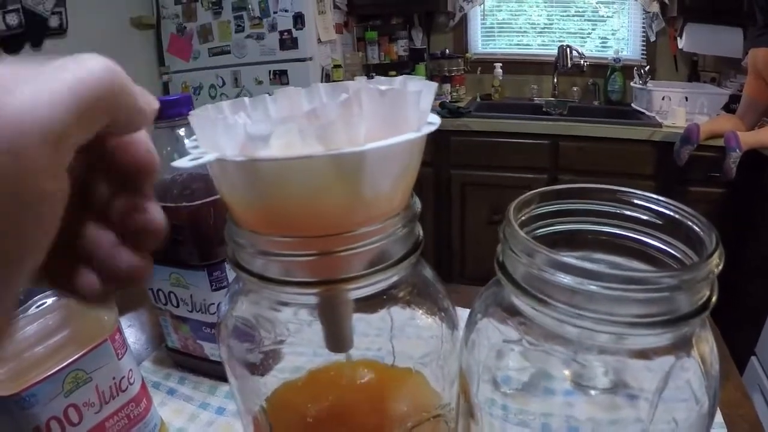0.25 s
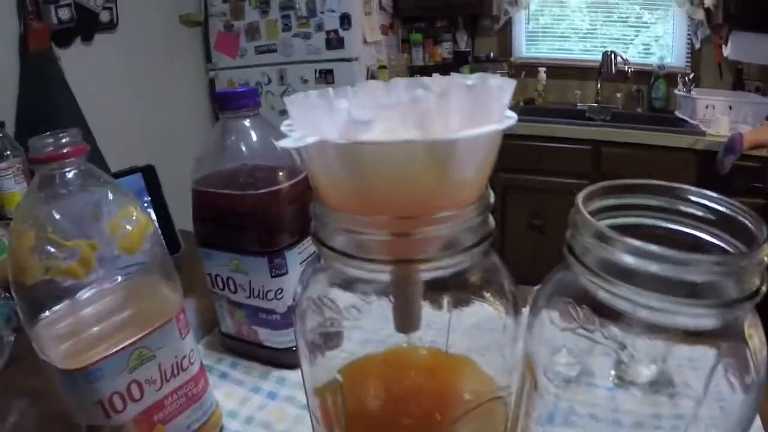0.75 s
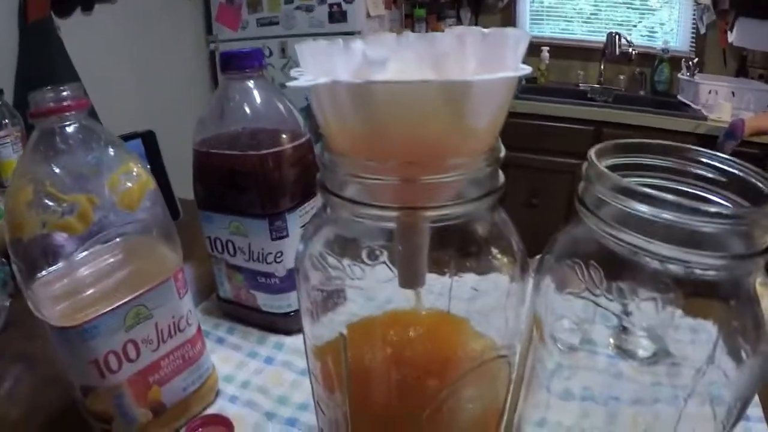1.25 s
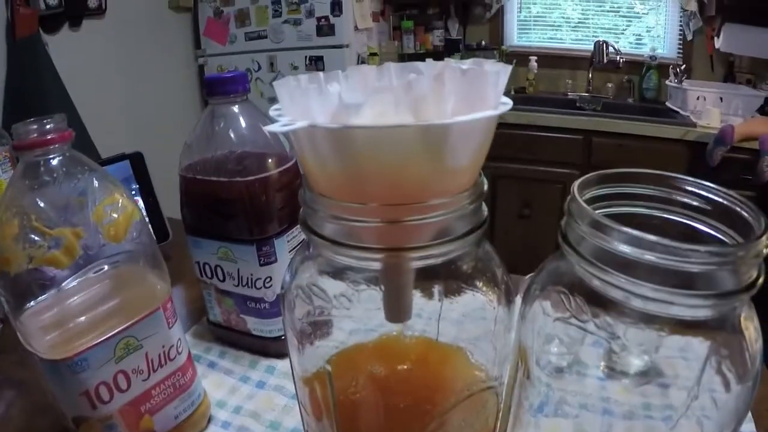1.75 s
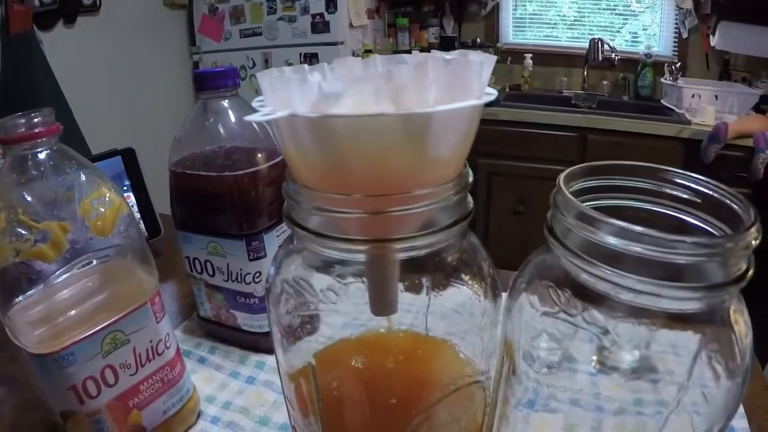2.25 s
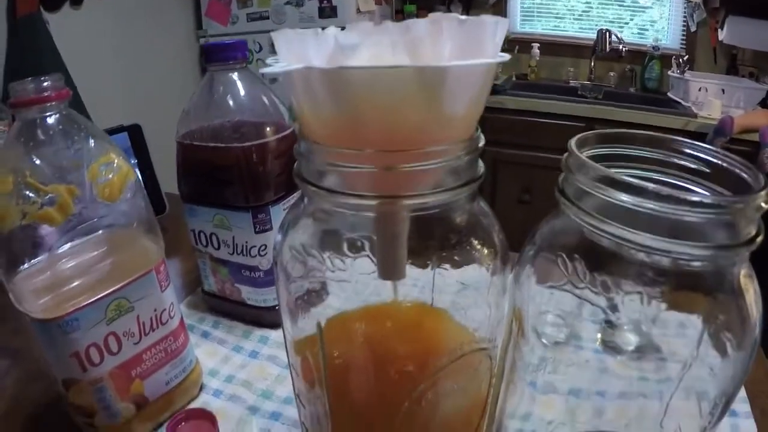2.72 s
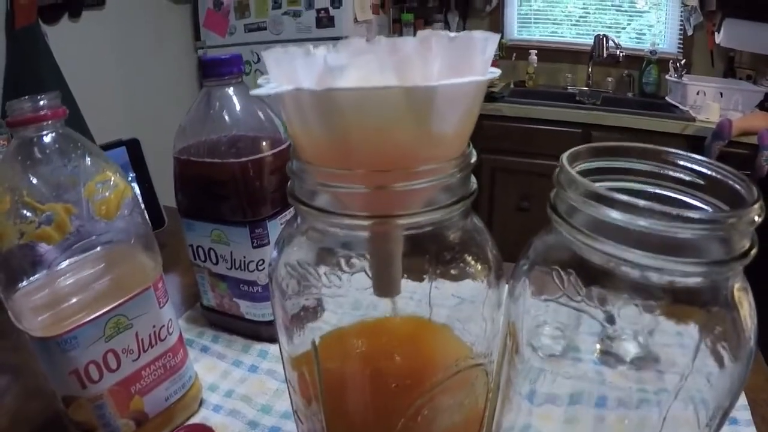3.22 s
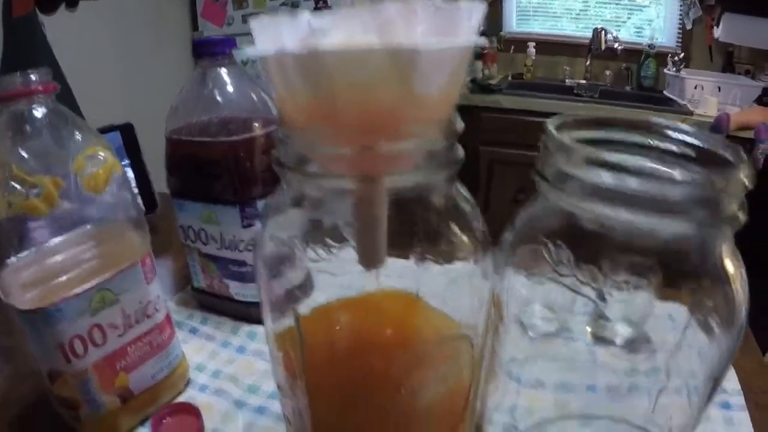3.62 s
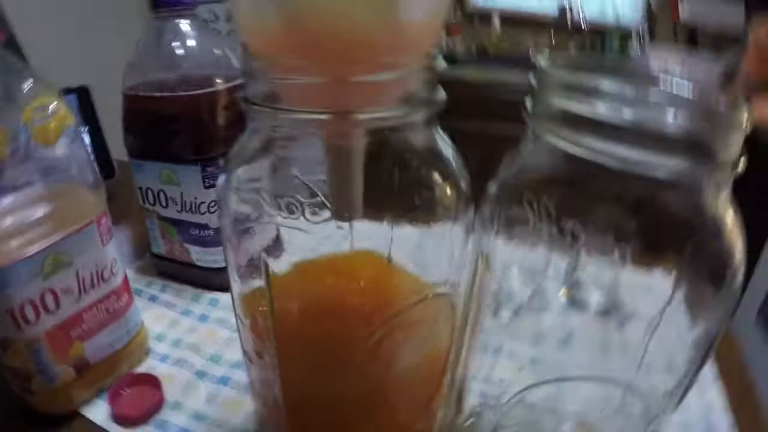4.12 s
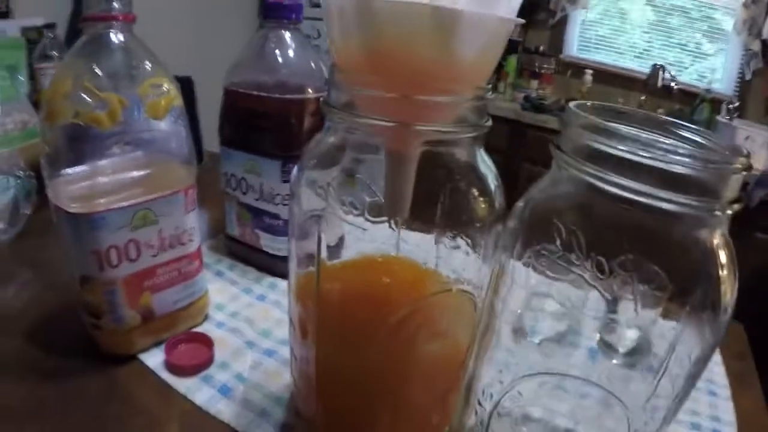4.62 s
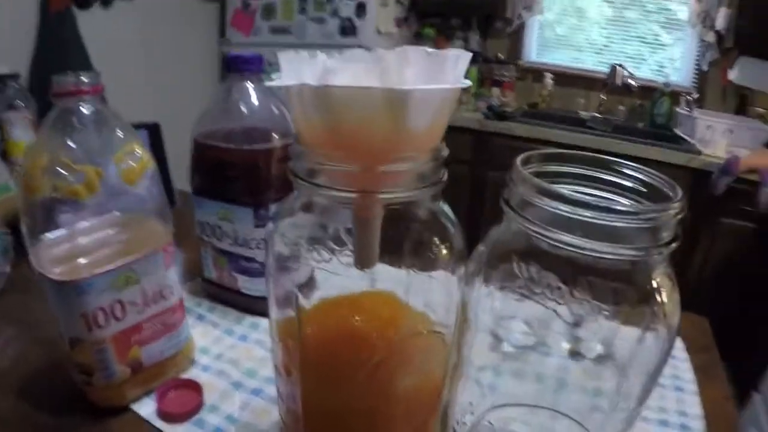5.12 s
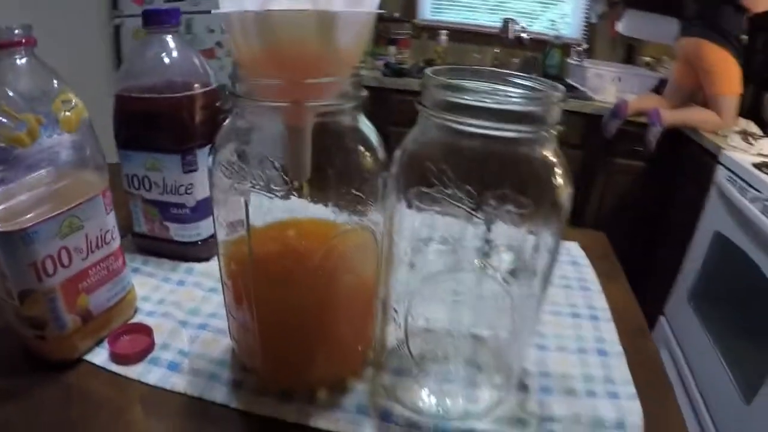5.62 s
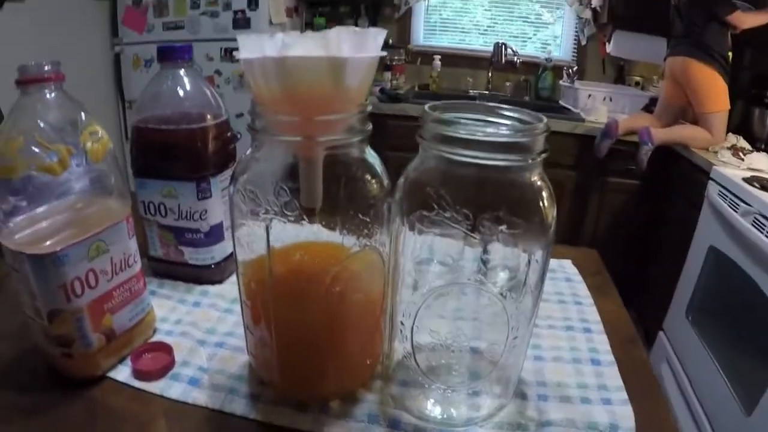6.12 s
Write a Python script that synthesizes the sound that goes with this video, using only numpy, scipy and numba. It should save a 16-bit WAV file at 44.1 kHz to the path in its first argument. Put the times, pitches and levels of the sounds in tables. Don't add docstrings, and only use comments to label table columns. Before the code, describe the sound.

Liquid drips with small glassy plinks into a jar in a humming kitchen, with heavy dull knocks, a sharp snap and faint cloth rustle.

```python
import sys
import numpy as np
from scipy import signal
from scipy.fft import rfft, irfft, next_fast_len
from scipy.io import wavfile
from scipy.ndimage import uniform_filter1d
from numba import njit

SR = 44100
rng = np.random.default_rng(int(sys.argv[2]) if len(sys.argv) > 2 else 0)


def elevation(decibels):
    levels = np.asarray(decibels, float)
    return 10 ** (levels / 20)


def digitize_waveform(pressure):
    field = np.atleast_2d(pressure).T
    bounded = np.clip(field, -1, 1)
    quanta = np.round(bounded * 32767).astype(np.int16)
    wavfile.write(sys.argv[1], SR, quanta)


N = 280917

# start in
# seconds, peak in dB, pitch in Hz.
JAR_DROPS = [(0.32, -46, 1870), (.552, -50.5, 1260), (1.0006, -50, 1910), (1.052, -53, 1780),
             (1.3199, -56.5, 1920), (1.4396, -57, 1890), (1.56, -60, 1264), (1.698, -67, 1920),
             (2.354, -65, 1890), (2.8799, -51, 1856), (2.882, -52.5, 1450), (3.11, -53.5, 1450),
             (3.119, -48.5, 1883), (3.255, -50, 1450), (3.4935, -52.5, 1910), (3.712, -49.5, 1873),
             (4.0668, -40, 1925), (4.375, -55, 1914), (5.0744, -60, 1845), (5.4006, -56, 1885),
             (5.5263, -55, 1937), (6.027, -45.5, 1930),
             (.81, -58, 3530), (.98, -58, 2444), (1.2, -63, 2440), (1.8054, -61, 3740),
               (2.3694, -60, 2460), (3.427, -45.5, 3810), (4.495, -57, 3760), (4.6044, -39.5, 3750),
               (4.6932, -54, 2470), (4.7, -59, 3760), (5.39, -58, 2350), (5.673, -55, 2800),
               (5.675, -61, 3820)]
# start in seconds, peak in dB, centre in Hz.
SPLASHES = [(.321, -46, 1870), (.696, -50, 1880), (0.8, -54, 2590), (.975, -49, 1910), (.9762, -48.5, 2310),
            (1.12, -51, 3980), (1.265, -54.5, 2990), (1.2895, -53, 2500), (1.4388, -45, 3050),
            (1.6741, -55, 2790), (3.6316, -50.5, 2760), (3.712, -44, 1876), (3.815, -41.5, 890),
            (4.4832, -45.5, 3290), (4.7122, -43, 2470), (4.7496, -49, 2460), (4.989, -43, 1680),
            (5.5707, -49, 2400), (5.7404, -54, 3180), (5.8396, -54, 2860), (5.9658, -44, 2900),
            (6.331, -54, 2880)]
# start in seconds, peak in dB, pitch in Hz.
TINKLES = [(.7976, -61, 6010), (1.1199, -58, 5070), (1.2645, -60.5, 7950), (1.3079, -52, 4990),
           (1.4396, -51, 4995), (1.5479, -62, 5530), (1.8198, -49.5, 5050), (1.9415, -57, 5930),
           (2.0438, -60, 5300), (4.5136, -58, 5989), (4.7117, -68, 4860), (4.7506, -55, 5370),
           (5.7894, -62, 5040), (5.9688, -63, 5940), (6.2294, -62, 5960), (6.3185, -64, 5360)]
# mode in Hz, T60 in seconds.
JAR_RING = [(1260, 0.055), (1450, 0.43), (1780, 0.77), (1900, .1), (2450, .25), (2800, .2), (3750, 0.19)]
DROP_LEAD_S = 0.001993
DROP_HELD_S, TINKLE_T60_S, SPLASH_T60_S = .024, .145, .068
# mode in Hz, width in Hz, level in dB.
JAR_WALLS = [(1046, 14.5, -79), (1793, 33, -82.5), (1847, 57, -77.5), (1910, 20, -80), (2470, 40, -81.5),
             (3760, 44, -81)]

# pitch in Hz, level in dB, T60 in seconds.
CLINK = [(1448, -21, 1.2), (1500, -5, .08), (1610, -5, .08), (1723, -1, .45), (1771, 0, .6),
         (1911, -4, .38), (1935, 5, .06), (2450, -21, .2), (3750, -22, .15)]
CLINK_S, CLINK_DB = .410, -44
# pitch in Hz, level in dB, T60 in seconds.
CUP = [(170, 2, 0.16), (343, -7, .2), (398.2, 1, 0.3), (813, -2, 0.29), (890, -3, 0.19), (1254, -16, 0.58),
       (1326, 3, 0.073), (1407, -5, 0.22), (1873, -13.5, 0.49), (1960, -8, .15), (2720, 6, 0.03),
       (3650, -13, 0.28), (5400, -9, .05), (2770, -7, 0.13)]
CUP_S, CUP_DB = 4.831, -39.5
# pitch in Hz, level in dB, T60 in seconds.
PAN = [(178.9, 4.5, 0.41), (427, -3, 0.16), (804, -11, 0.14), (1170, -5.5, 0.081), (1450, -7, 0.079),
       (1756, -6, 0.092), (2044, -6, 0.063), (2350, 1, 0.043), (2860, -3.5, 0.06)]
PAN_S, PAN_DB = 6.162, -33.5
# pitch in Hz, level in dB, T60 in seconds.
SNAP = [(560, 0, 0.017), (820, 4.5, 0.0095), (1250, 4, .01), (1800, -6, 0.009), (2350, 7, 0.013),
        (2640, -4, 0.0088), (3200, -6, 0.0083), (3720, -1.5, 0.011), (5300, -5, .01), (5850, -10, .01)]
# start in seconds, level in dB.
SNAPS = [
    (4.1665, -47),
    (4.1812, -30),
    (4.1965, -59),
]
# start in seconds, level in dB, pitch in Hz, T60 in seconds.
THUDS = [
    (2.64, -24.5, 145, 0.42),
    (3.72, -44, 66, 0.6),
    (6.165, -26, 52, 0.32),
    (6.19, -30, 29.8, 0.5),
]

# start in seconds, thump in dB, rap in dB, scrape in dB, T60 in seconds.
KNOCKS = [
    (2.4407, -32.5, -53, -70, .095),
    (2.4897, -31, -60, -67, .14),
    (2.66, -24, -41, -49.5, .35),
    (2.7195, -37, -49.5, -67, .42),
    (3.1904, -47, -39, -48, 0.35),
    (4.8351, -35, -32, -48, 0.23),
    (6.1624, -24.5, -32, -90, .26),
    (6.25, -46, -66, -65, .23),
]
# centre in Hz, width in Hz, level in dB.
THUMP = [(145, 92, -6.5), (322, 395, -13.5)]
# centre in Hz, width in Hz, level in dB.
RAP = [(940, 900, -7), (2550, 2200, -11.5)]
# centre in Hz, width in Hz, level in dB.
SCRAPE = [(5740, 4100, -7)]
KNOCK_CONTACT_S, SOFTNESS = 0.0047, 0.19
# frequency in Hz, gain in dB.
CORNER = [(60, 7), (1000, -1.5), (1650, 1), (2400, 1), (3000, 0.5), (3650, 1.5), (4400, -2), (5400, -0.5),
          (6200, -0.5), (7200, -8), (15000, -15)]
# start in seconds, peak in dB.
TICKS = [
    (0.41, -55),
    (0.9742, -57),
    (1.4376, -54),
    (3.1854, -51),
    (4.1809, -55),
    (4.4823, -59),
    (4.8336, -55),
    (4.9887, -54),
]

# peak time in seconds, rise in seconds, fall in seconds, peak in dB, dull part in dB.
SLEEVE = [
    (2.92, .14, .17, -62.5, -2),
    (3.82, 0.0065, 0.093, -60.5, 4),
    (5.012, 0.11, .09, -58.5, 0.5),
    (5.58, 0.087, .4, -65.5, 0),
    (5.964, .03, .09, -62.5, -2),
    (6.25, .02, 0.055, -66, -1),
    (6.36, 0.086, .05, -64.5, 4),
]
# peak time in seconds, rise in seconds, fall in seconds, peak in dB, dull part in dB.
TOWEL = [(3.86, .03, .12, -63, 1), (3.965, .05, 0.11, -55, -1.5), (4.056, .035, 0.023, -49.5, -5),
         (4.19, .004, .015, -49.5, -1), (4.27, 0.084, .017, -52.5, 1), (4.616, .085, 0.06, -57, -15),
         (4.71, .035, .08, -62.5, 1.5), (4.8, .03, 0.023, -62.5, -7), (4.902, .005, 0.073, -57.5, 3),
         (5.74, .05, .1, -65, -12), (6.215, .02, 0.036, -58, 10)]
STROKE_SWELL_DB, SLEEVE_BRIGHT_DB, TOWEL_BRIGHT_DB = 12.5, -5, -11

# time in seconds, shaft speed in Hz.
SHAFT = [(0, 28.44), (1.1, 28.45), (1.6, 28.75), (2.9, 28.28), (3.9, 28.16), (4.4, 28.44), (6.37, 28.4)]
# time in seconds, level in dB.
NEARNESS = [(0, -3.5), (1.0, -4), (2.2, -5), (2.9, 0), (6.37, 0)]
# order, level in dB, share of the nearness change as a ratio.
MOTOR_LOWER = [(1, -45.5, 1.1), (2, -44.5, 0.76), (3, -55, 1.03), (5, -49.5, 0.1)]
# order, level in dB.
MOTOR_UPPER = [(4, -83), (6, -63.5), (7, -67.5), (8, -66.5), (11, -67.5), (12, -70)]
# shaft order, time in seconds, depth in dB, half width in seconds.
NODES = [(1, 1.16, -12, 0.27), (2, 1.58, -16, 0.19), (2, .1, -3, .3), (5, .45, -5, 0.23),
         (5, 1.42, -4, 0.26), (1, 4.3, -2, .3), (1, 5.9, -2, .5)]
# time in seconds, pitch in Hz.
FAN_HZ = [(0, 122), (.7, 122.2), (1.1, 123.3), (1.85, 123.8), (2.4, 122.9), (3.7, 122.2), (4.85, 122.5),
          (5.3, 123.3), (6.37, 123.2)]
# time in seconds, level in dB.
FAN_DB = [(0, -47.5), (.44, -43.5), (.88, -56.5), (1.5, -44), (1.8, -43), (2.42, -46.5), (2.9, -41),
          (3.1, -43), (3.3, -51.5), (3.7, -43), (4.15, -47), (4.4, -38.5), (4.65, -38), (5.3, -46),
          (5.8, -39.5), (6.37, -37)]
# pitch in Hz, level in dB.
TONES = [(49.9, -62), (99.9, -76), (161.6, -67), (176.8, -76), (179.9, -63.5), (242.5, -60.5),
         (353.4, -67.5), (404.2, -65.5), (412.3, -71), (444.5, -64)]
# pitch in Hz, width in Hz, level in dB.
WHINES = [(2590, 7.4, -77.5), (3588, 14, -76.5)]
# frequency in Hz, level in dB per Hz.
ROOM = [(8.8, -23), (15, 0.5), (38, -3.5), (72, -20.5), (131, -4), (186, -12.5), (287, -17), (431, -15.5),
        (543, -24), (1030, -28), (1540, -37.5), (1830, -35), (2440, -36.5), (3660, -38), (15100, -52)]
ROOM_DB, ECHO_DB = -49.5, -43
# start in seconds, length in seconds.
TOP_GAPS = [(.3, .04), (2.04, .035), (2.93, .01), (3.02, .04), (4.48, .015), (4.8, .025), (5.52, .025),
            (5.84, .025), (5.94, .025), (6.09, .015), (6.13, .05)]
TOP_HZ, GAP_FROM_HZ = 15300, 13200


def noise(size):
    return rng.standard_normal(N if size > SR else SR)[:size]


@njit
def svf(x, g, k):
    y, b, l = np.empty(len(x)), 0., 0.
    for i in range(len(x)):
        v = (b + g * (x[i] - l)) / (1 + g * (g + k))
        b, l, y[i] = 2 * v - b, l + 2 * g * v, k * v
    return y


def band(hz, width, size=N):
    g, k = np.tan(np.pi * hz / SR), width / hz
    y = svf(svf(noise(size), g, k), g, k)
    return y / y.std()


def colour(x, table):
    size = next_fast_len(N)
    f = np.maximum(np.fft.rfftfreq(size, 1 / SR), 1)
    hz, db = np.transpose(table)
    gain = elevation(np.interp(np.log(f), np.log(hz), db))
    return irfft(rfft(x, size) * gain, size)[:N]


def walk(rate):
    hold = int(SR / rate)
    steps = np.repeat(noise(size=SR)[:N // hold + 1], hold)
    return 1.12 * uniform_filter1d(uniform_filter1d(steps, hold), hold)[:N]


def curve(table):
    s, value = np.transpose(table)
    return np.interp(np.arange(N) / SR, s, value)


def add(out, s, sound):
    i = int(s * SR)
    out[i:i + len(sound)] += sound[:N - i]


def fade(t60, rise_s, held_s=0.):
    t = np.arange(int((t60 + held_s) * SR)) / SR
    rise = 1 - np.exp(-t / rise_s)
    return t, rise * elevation(-60 * np.maximum(t - held_s, 0) / t60)


def glass_drop(db, hz, t60, held_s, spread, cluster_db):
    t, env = fade(t60, .0004, held_s)
    settle = 2000
    cluster = elevation(cluster_db) * band(hz, spread, size=len(t) + settle)[settle:]
    return elevation(db) * env * (np.sin(2 * np.pi * hz * t) + cluster)


def drips():
    out = np.zeros(N)
    for s, db, hz in JAR_DROPS:
        t60 = min(JAR_RING, key=lambda mode: abs(mode[0] - hz))[1]
        add(out, s - DROP_LEAD_S, glass_drop(db - 8, hz, t60, DROP_HELD_S, spread=140, cluster_db=-8.5))
    for s, db, hz in SPLASHES:
        add(out, s, glass_drop(db - 11.5, hz, SPLASH_T60_S, 0.0029, spread=380, cluster_db=2.5))
    for s, db, hz in TINKLES:
        t60 = TINKLE_T60_S
        add(out, s, glass_drop(db - 10, hz, t60, 0.0072, spread=120, cluster_db=-3.5))
        add(out, s, glass_drop(db - 17.5, 1.055 * hz, t60, 0.0071, spread=180, cluster_db=-4))
        add(out, s, glass_drop(db - 16.5, 1.14 * hz, .6 * t60, 0.0036, spread=400, cluster_db=-2))
    return out


def trickle():
    return sum(elevation(db + 3.6 * walk(12)) * band(hz, width) for hz, width, db in JAR_WALLS)


def crockery():
    out = np.zeros(N)
    struck = [(CLINK_S, CLINK_DB, CLINK, .005), (CUP_S, CUP_DB, CUP, .12), (PAN_S, PAN_DB, PAN, .1)]
    struck += [(s, db, SNAP, .005) for s, db in SNAPS]
    for s, level_db, modes, rattle_s in struck:
        for hz, db, t60 in modes:
            t, env = fade(rattle_s, 0.00081)
            push = env * noise(len(t))
            push *= 0.45 / np.sqrt(np.sum(push ** 2))
            push[int(rng.random() * .0012 * SR)] = 1
            t, env = fade(t60, 0.00057)
            ring = elevation(level_db + db) * env * np.sin(2 * np.pi * hz * t)
            add(out, s, signal.fftconvolve(ring, push))
    return out


def thuds():
    out = np.zeros(N)
    for s, db, hz, t60 in THUDS:
        t, env = fade(t60, 0.024)
        add(out, s, elevation(db) * env * np.sin(2 * np.pi * hz * t))
    return out


def knocks():
    out = np.zeros(N)
    for s, *parts_db, t60 in KNOCKS:
        thump_db, rap_db, _ = parts_db
        contact_s = KNOCK_CONTACT_S * elevation(SOFTNESS * (thump_db - rap_db))
        for part_db, part in zip(parts_db, (THUMP, RAP, SCRAPE)):
            for hz, width, db in part:
                slow = (2500 / hz) ** 0.18
                t, env = fade(t60 * slow, contact_s * slow)
                add(out, s - .002, elevation(part_db + db) * env * band(hz, width, size=len(t)))
    return colour(out, CORNER)


def ticks():
    out = np.zeros(N)
    for s, db in TICKS:
        t, env = fade(0.0094, 0.00024)
        add(out, s, elevation(db - 2.0) * env * band(12100, 7500, size=len(t)))
    for s, _, _, scrape_db, _ in KNOCKS:
        t, env = fade(.3, .008)
        add(out, s, elevation(scrape_db - 20) * env * band(9500, 7900, size=len(t)))
    return out


def rustle():
    power = np.zeros((3, N))
    for strokes, bright_db in ((SLEEVE, SLEEVE_BRIGHT_DB), (TOWEL, TOWEL_BRIGHT_DB)):
        for s, rise_s, fall_s, db, dull_db in strokes:
            before = np.linspace(2, 0, int(2 * rise_s * SR))
            after = np.linspace(0, 2, int(2 * fall_s * SR))
            swell_db = db - STROKE_SWELL_DB * np.r_[before, after]
            for part, part_db in zip(power, (0, bright_db, dull_db)):
                add(part, s - 2 * rise_s, elevation(2 * (swell_db + part_db)))
    grains = [band(2840, 1970), band(5500, 1870), band(833, 480)]
    cloth = np.sum(np.sqrt(power) * grains, axis=0)
    return colour(cloth * elevation(2.4 * walk(120)), CORNER)


def motor():
    t, near_db = np.arange(N) / SR, curve(NEARNESS)
    turn = 2 * np.pi * np.cumsum(curve(SHAFT)) / SR
    out = np.zeros(N)
    for k, db, share in MOTOR_LOWER:
        dips_db = sum(depth * np.exp(-((t - s) / half) ** 2) for j, s, depth, half in NODES if j == k)
        out += elevation(db + share * near_db + dips_db) * np.sin(k * turn + k * k)
    for k, db in MOTOR_UPPER:
        out += elevation(db + 1.9 * walk(2.0)) * np.sin(k * turn + k)
    return np.sqrt(2) * out


def appliances():
    t = np.arange(N) / SR
    out = elevation(curve(FAN_DB)) * np.sin(2 * np.pi * np.cumsum(curve(FAN_HZ)) / SR)
    for hz, db in TONES:
        out += elevation(db + 1.2 * walk(3.11)) * np.sin(2 * np.pi * hz * t + hz)
    return np.sqrt(2) * out


def whistles():
    t, out = np.arange(N) / SR, np.zeros(N)
    for hz, width, db in WHINES:
        tone = np.sin(2 * np.pi * hz * t)
        out += elevation(db + 2.4 * walk(3.12)) * (tone + 0.49 * band(hz, width))
    return out


def room():
    air = elevation(0.62 * walk(6)) * colour(rng.standard_normal(N), ROOM)
    return air / air.std() * elevation(ROOM_DB)


def echo(near):
    t, tail = fade(0.36, 0.0048)
    return elevation(ECHO_DB) * signal.fftconvolve(near, tail * noise(len(t)))[:N]


def scene():
    near = drips() + crockery() + thuds() + knocks()
    handling = ticks() + rustle()
    background = motor() + appliances() + whistles() + room()
    return (near + echo(near) + handling + trickle() + background)[None]


def roll_off(x):
    return signal.sosfilt(signal.butter(12, 15280, fs=SR, output="sos"), x)


def record(dry):
    size = next_fast_len(N)
    f, t = np.fft.rfftfreq(size, 1 / SR), np.arange(N) / SR
    spectrum = rfft(dry, size)
    body = irfft(spectrum * (f <= GAP_FROM_HZ), size)[:, :N]
    top = irfft(spectrum * ((f > GAP_FROM_HZ) & (f < TOP_HZ)), size)[:, :N]
    kept = 1. - sum((t > s) & (t < s + length) for s, length in TOP_GAPS)
    return roll_off(body + top * uniform_filter1d(kept, size=300))


dry = scene()
out = record(dry)
digitize_waveform(out)
```